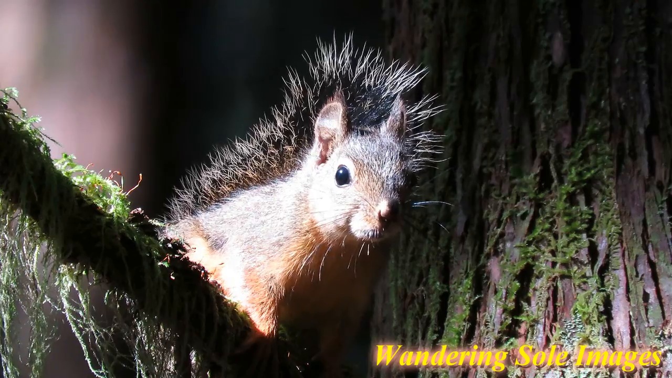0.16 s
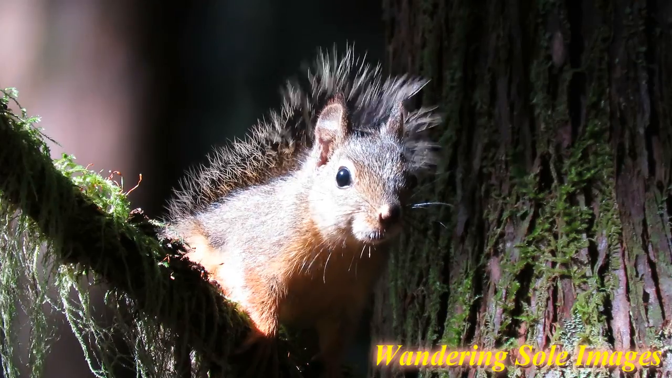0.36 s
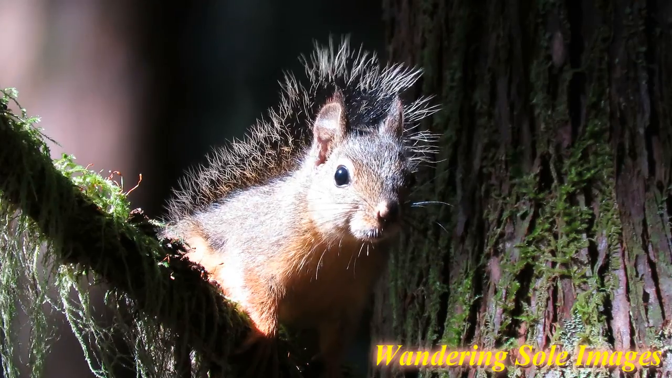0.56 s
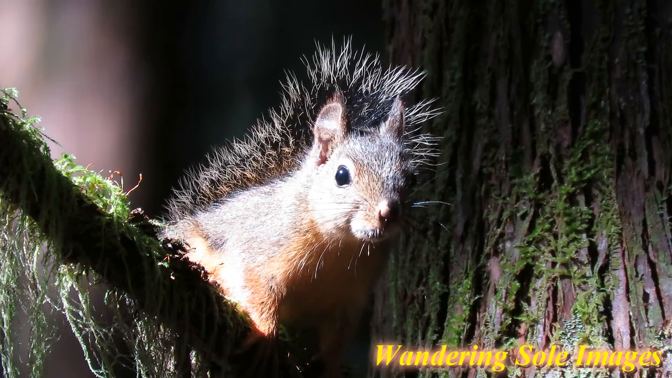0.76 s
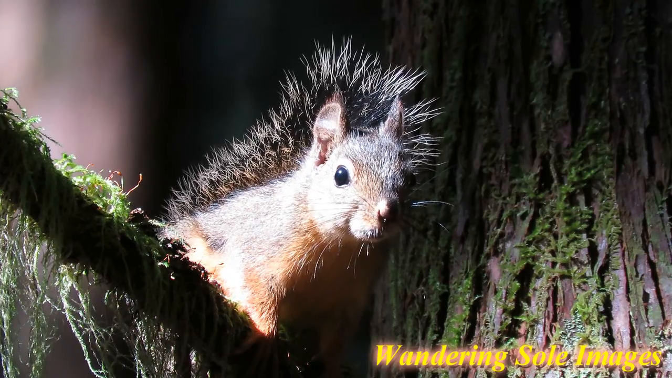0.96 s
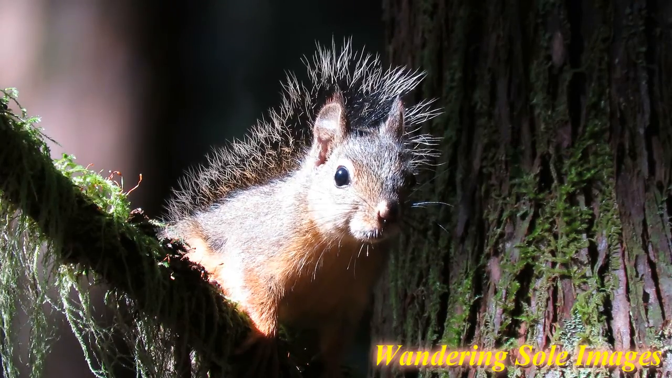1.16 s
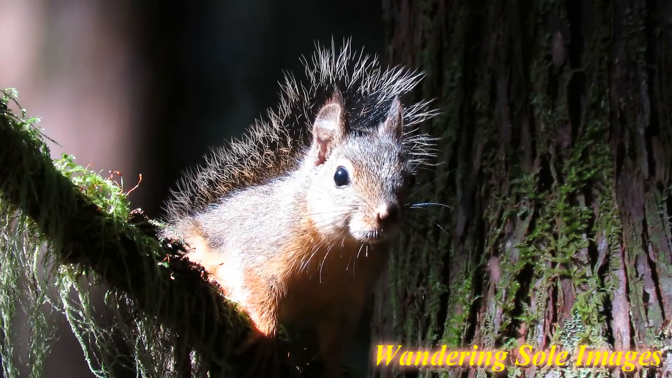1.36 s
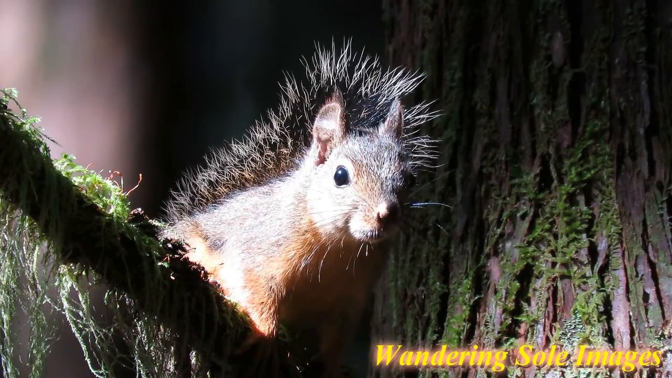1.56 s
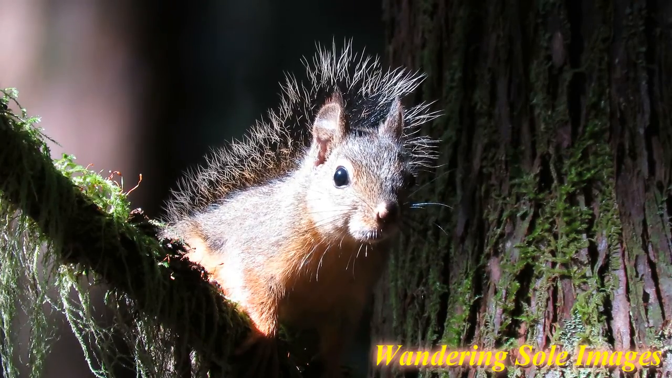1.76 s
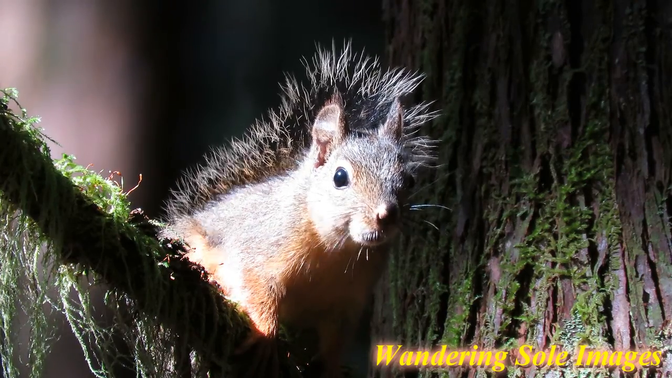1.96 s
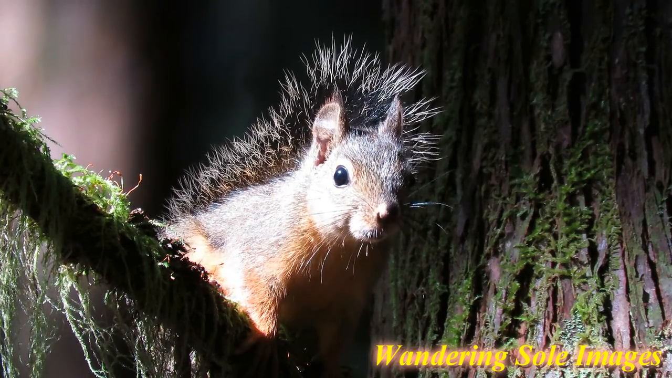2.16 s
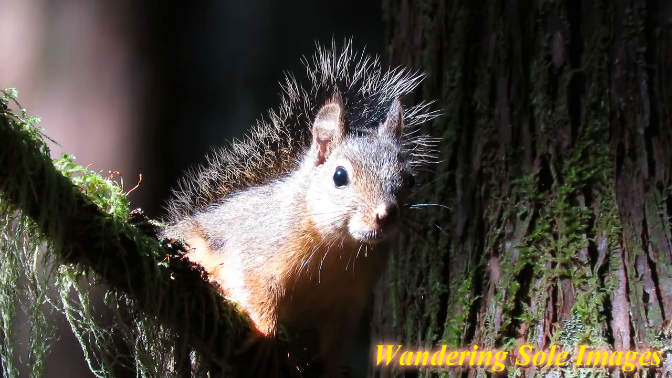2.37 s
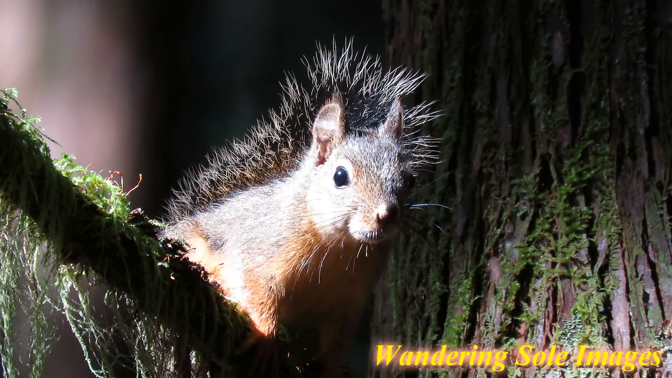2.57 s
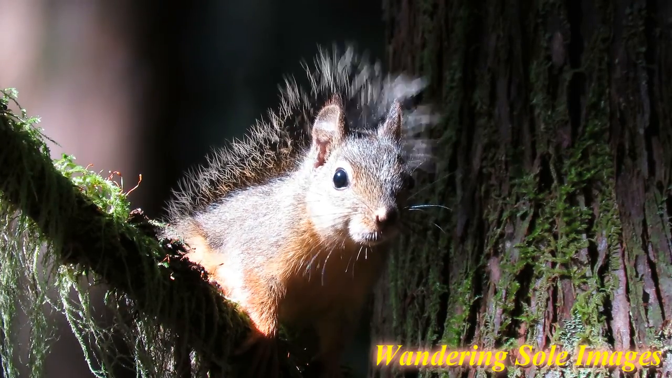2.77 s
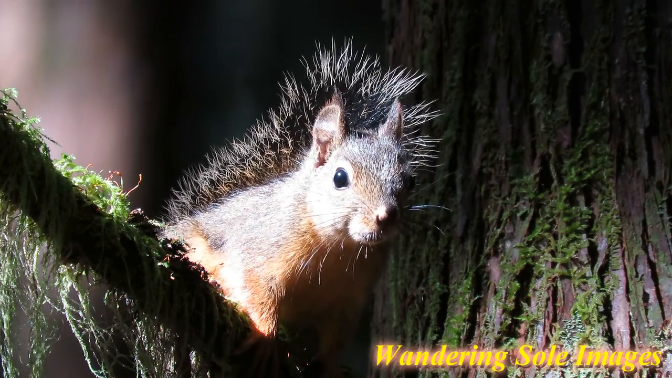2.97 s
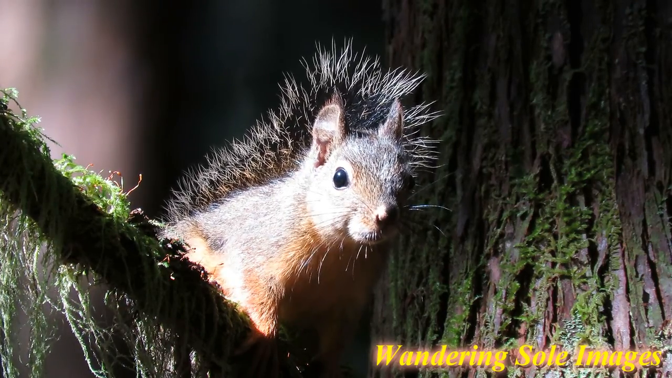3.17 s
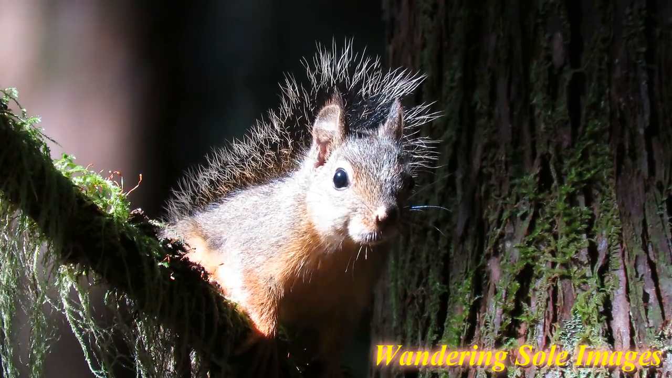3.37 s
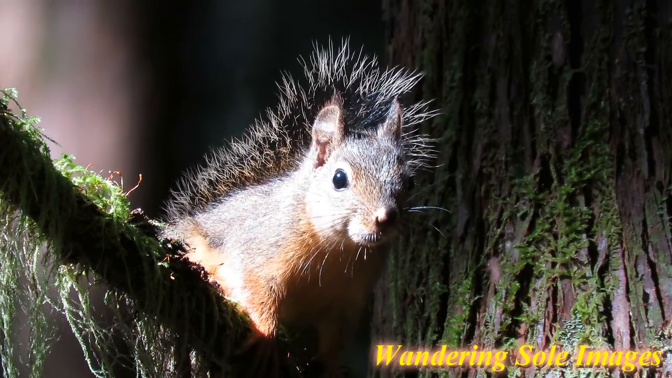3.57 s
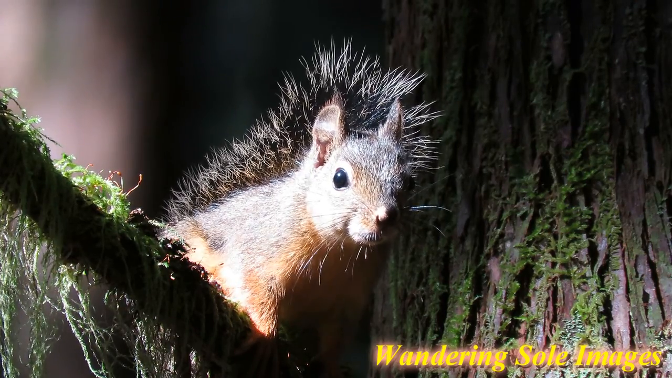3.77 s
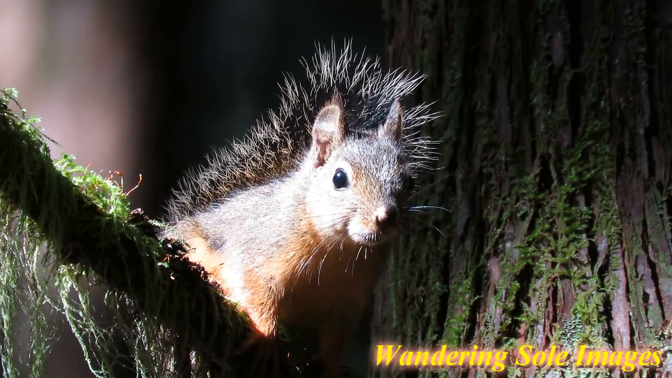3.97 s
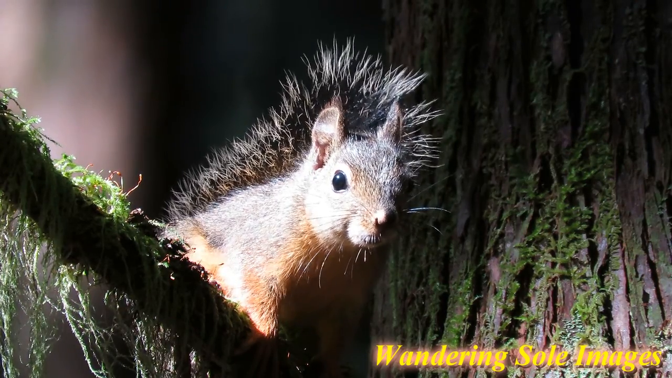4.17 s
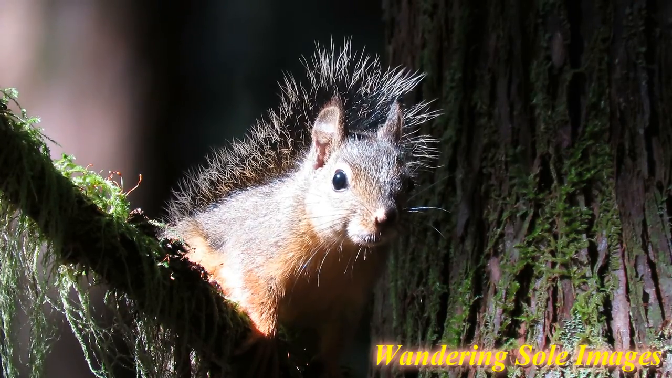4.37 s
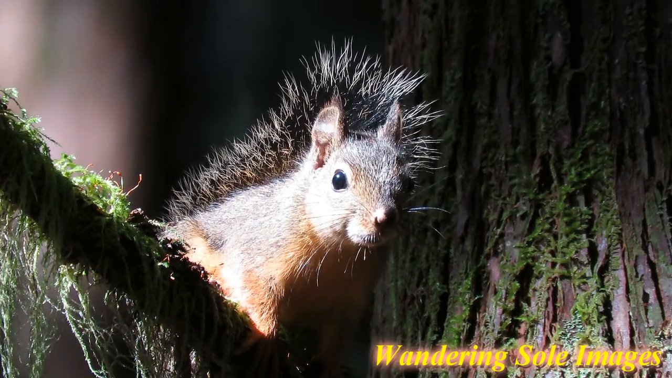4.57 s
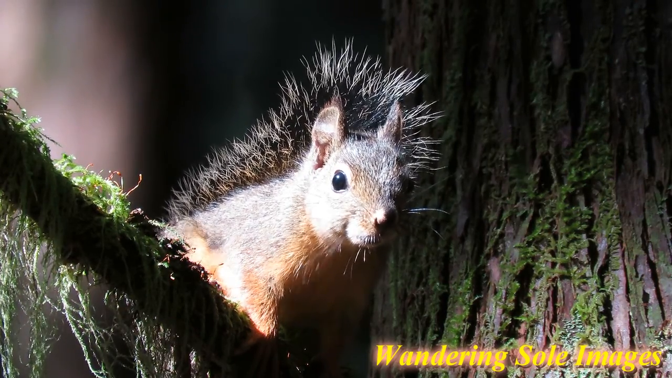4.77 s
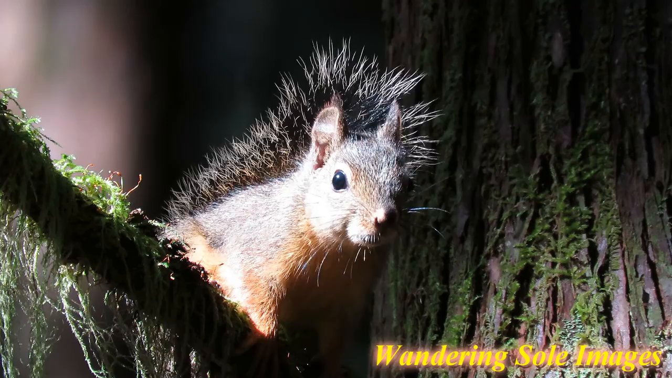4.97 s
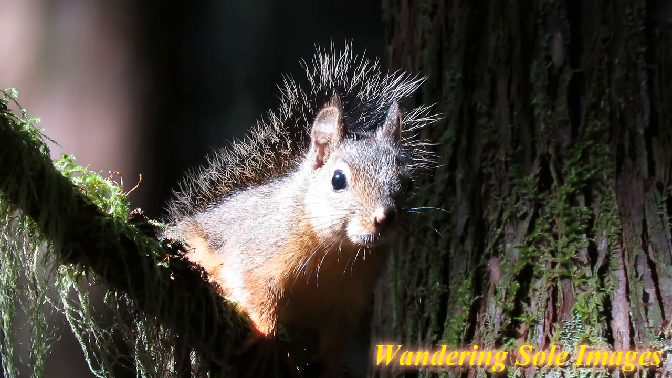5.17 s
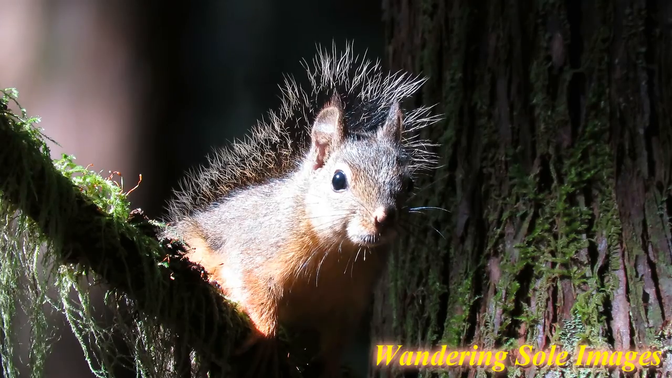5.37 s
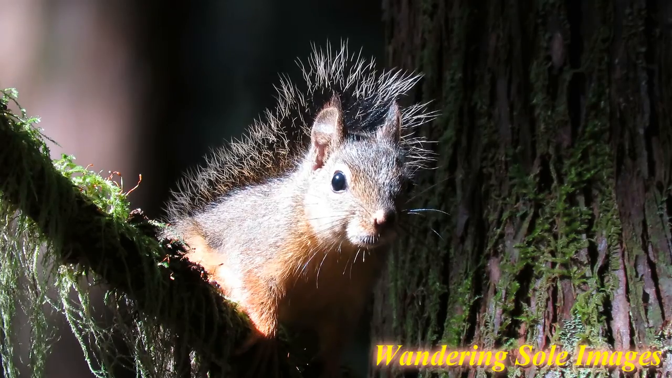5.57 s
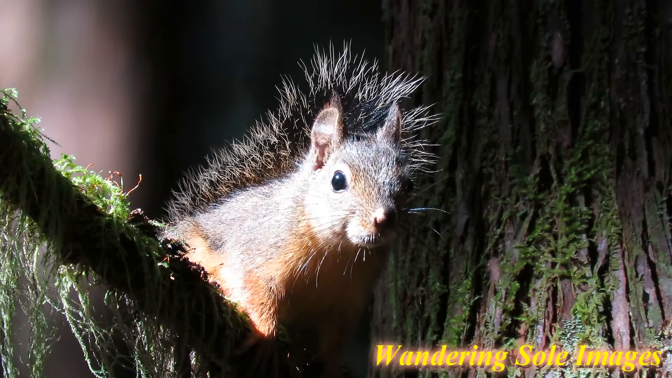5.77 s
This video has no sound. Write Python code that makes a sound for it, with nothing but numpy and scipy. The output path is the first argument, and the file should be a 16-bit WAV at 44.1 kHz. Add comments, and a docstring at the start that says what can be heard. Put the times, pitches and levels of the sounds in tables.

```python
"""In a wood, a stereo microphone faces a squirrel on a branch a few metres off, giving eight alarm chirps.
Each is a near-sine whistle that breaks and slides down with a flutter; a rising squeak follows the last.
Noise echoes scatter the calls off the trunks. Three low lines make a far engine's drone, and a stack of
wing-beat multiples makes a fly that buzzes past once. Filtered noise rustles widely around the microphone."""
import sys
import numpy as np
from scipy import signal
from scipy.fft import rfft, irfft, next_fast_len
from scipy.io import wavfile

SR = 44100
rng = np.random.default_rng(int(sys.argv[2]) if len(sys.argv) > 2 else 0)


def unload_wav(signal):
    """Save mono or channel-first audio to the path in sys.argv[1] as 16-bit WAV at rate SR, clipped to [-1, 1]."""
    wavfile.write(
        sys.argv[1],
        SR,
        np.round(np.clip(np.atleast_2d(signal).T, -1, 1) * 32767).astype(np.int16),
    )


N = 256970
T = np.arange(N) / SR  # s
M = next_fast_len(N)
BINS_HZ = np.fft.rfftfreq(M, 1 / SR)

# far engine, strength of its three lines: (time [s], multiple 1 [dB], multiple 2 [dB], multiple 3 [dB])
ENGINE_LINES = [(0.0, -60, -55, -73), (0.34, -54, -53.5, -64.5), (0.66, -65.5, -74, -60),
                (0.83, -59, -51.5, -62), (0.96, -64, -63, -52.5), (1.25, -62, -50, -65.5),
                (1.34, -54.5, -60, -73), (1.62, -57.5, -48, -66), (1.98, -64.5, -58.5, -60),
                (2.29, -51, -58.5, -64), (2.42, -50.5, -55.5, -74), (2.51, -51.5, -48.5, -61),
                (2.65, -54, -78, -67), (2.71, -56, -58, -65), (2.9, -59, -67, -56), (3.07, -68, -58, -63),
                (3.31, -52.5, -51, -57), (3.46, -65, -49.5, -60), (3.6, -63, -57.5, -67),
                (4.67, -58, -57, -68), (5.37, -61, -54.5, -63), (5.5, -71, -59.5, -73),
                (5.83, -58, -69.5, -59.5)]
# far engine, pitch of its lowest line: (time [s], frequency [Hz])
ENGINE_PITCH = [(0, 95), (3.3, 95), (4.2, 96.2), (4.9, 96.2), (5.5, 95)]
# colour of the noise straight ahead, with a steep fall in the top treble, before its overall level is set:
# (frequency [Hz], density [dB per Hz])
NOISE_MID_COLOUR = [(12, -71), (20, -37), (64, -20), (90, -12.5), (190, -10.5), (300, -12), (476, -13),
                    (640, -17.5), (850, -17), (1010, -13.5), (1200, -20.5), (4000, -30), (10000, -43),
                    (12600, -49.5), (14500, -54), (15400, -72)]
# colour of the noise out to the sides, likewise: (frequency [Hz], density [dB per Hz])
NOISE_SIDE_COLOUR = [(12, -70), (20, -42), (45, -34), (112, -13), (152, -8.5), (258, -3.5), (450, -3),
                     (546, -9.5), (664, -9), (6670, -33), (10000, -40.5), (12600, -43), (14500, -58),
                     (15400, -70)]
# chirps, levels ahead of the throat: (onset [s], whistle length [s], top pitch [Hz], whistle level [dB],
#  effort setting of the break [1], dip pitch [Hz], shelf end after the break [s], shelf end pitch [Hz],
#  low note peak after the break [s], low note level [dB], pitch flutter [share], level flutter [share])
CHIRPS = [(0.465, 0.027, 2804, -24.5, 0.84, 1528, 0.097, 1479, 0.14, -22, 0.056, 0.59),
          (1.371, .028, 2804, -25, 1.42, 1518, .094, 1499, 0.13, -24, 0.078, 0.37),
          (2.138, .028, 2822, -25, 1.46, 1761, 0.1, 1378, .134, -24.5, 0.092, 0.29),
          (2.862, .026, 2789, -24.5, 1.25, 1500, 0.085, 1400, 0.13, -22.5, .078, 0.38),
          (3.564, .029, 2814, -23.5, 1.5, 2057, .11, 1400, 0.15, -24, 0.079, 0.57),
          (4.246, .026, 2748, -24.5, 1.4, 1689, .1, 1450, .136, -23, .07, 0.25),
          (4.964, 0.027, 2781, -24, 1.94, 2072, 0.086, 1470, .110, -27.5, 0.031, 0.36),
          (5.555, 0.027, 2810, -25, 1.85, 1578, .11, 1493, 0.14, -26.5, 0.039, .24)]
# opening of each whistle: (time from onset [s], pitch [share of top], level re whistle [dB], effort [1])
WHISTLE_OPENING = [(-.010, .58, -24, 0), (-.006, .60, -10, 0.85), (-.004, .84, -8, 0.89),
                   (.003, .92, -5.5, 1.14), (.012, .95, -1, 0.77)]
# mouth and throat resonances: (frequency [Hz], gain [dB])
THROAT_GAIN = [(900, -15), (1500, -9), (2100, -10.5), (2450, -3.5), (2780, 0.5), (3300, -16.5),
               (3800, -0.5), (4300, 9.5), (5150, 12), (5650, -2.5), (6300, 12.5), (7300, 1), (8300, -7),
               (9400, 1.5), (10700, 8), (11400, -4.5), (12300, 4.5), (14000, -13)]
# vocal folds at full effort, multiples 1-4: (level [dB])
FOLD_OVERTONES = [-0.5, -16.5, -34.5, -28]
# air rushing past the teeth: (frequency [Hz], gain against the voice [dB])
BREATH_COLOUR = [(1000, -24), (2600, -10), (3400, -21.5), (4600, -4), (6300, -19.5), (7300, -18),
                 (8400, -21), (9400, -16), (11000, -13.5), (12400, -19), (13500, -41), (15000, -51)]
# rising squeak, ahead of the throat: (time [s], pitch [Hz], level [dB])
SQUEAK_GLIDE = [(5.728, 1010, -46), (5.74, 1034, -41), (5.76, 1307, -39.5), (5.78, 1640, -40.5),
                (5.799, 1866, -33.5), (5.827, 2010, -33)]
# folds driven by indrawn air, multiples 1-9: (level [dB])
SQUEAK_OVERTONES = [0.5, -34, -41, -48, -50, -46, -39, -48, -40]
# echoes off branch, near trunks, far trunks: (start [s], 60 dB decay [s], level [dB], side re mid [dB])
TRUNK_ECHOES = [(.002, .07, -10.5, -7), (0.027, .22, -14.5, -9.5), (0.083, .8, -24, -11)]
# thin trunks scatter treble best: (frequency [Hz], gain [dB])
BARK_COLOUR = [(800, -6.5), (1600, -1), (2800, 1.5), (5000, -1), (11000, 2), (15000, 21)]
# wing beat, multiples 1-8: (level [dB])
WING_OVERTONES = [0.5, 0.5, -5.5, -1.5, -5, -8, -9, -13]

WOOD_MID_DB, WOOD_SIDE_DB = -52, -47  # rms above 300 Hz, before gusts
RASP_DB, WOBBLE = 4.5, 0.01134  # drift of overtone level; drift of pitch as a share
DIP_S, REBOUND_S, SETTLE_S = .012, .022, .043  # after the break
REBOUND_HZ, REBOUND_DB = 1948, -26  # level for a dip that only reaches the rebound pitch
REBOUND_DB_PER_KHZ = 5  # a deeper dip rebounds louder
SHELF_HZ, SHELF_HZ_PER_EFFORT = 1303, 202.6  # a harder break starts the shelf higher
SHELF_DB, SHELF_SAG_DB = -24, -2
STEP_S, STEP_DB, STEP_DB_PER_FLUTTER = 0.01555, -28, -8  # weak spot, deeper where the level flutters
LOW_HZ, LOW_HOLD_S = 1186, .014  # low note, near full level this long before its peak
FADE_HZ, FADE_S, FADE_DB = 1031, .029, -13  # fade of the low note
FLUTTER_HZ = 115  # mean rate
FLUTTER_LEAD = 0.82  # radians by which the level swing leads the pitch swing
SLIDE_DULL_DB, SLIDE_BREATH_DB, BREATH_FADE_S = -11.5, -22.5, 0.038
FLY_S, FLY_DB = 1.948, -56  # arrival; level of approach before the wing-beat levels
FLY_ATTACK_S, FLY_HOLD_S, FLY_FADE_DB_PER_S = 0.067, .17, -48
WING_HZ = 163.6
WING_SAG_HZ, WING_SAG_S, WING_SAG_WIDTH_S = 8, 2.19, .17  # the beat slows while the fly is near
TOP_HZ = 15300  # top of the audible band


def undb(db):
    """Turn decibels into an amplitude factor."""
    return np.exp(np.asarray(db) * (np.log(10) / 20))


def along(table, hz):
    """Read a (frequency [Hz], level [dB]) table on a log-frequency axis."""
    f, db = np.transpose(table)
    return np.interp(np.log(np.maximum(hz, 1)), np.log(f), db)


def walk(rate):
    """Random drift joined by straight lines, a new value every 1 / rate s; spread near 1."""
    knots = rng.standard_normal(int(N / SR * rate) + 2)
    return 1.167 * np.interp(T * rate, np.arange(len(knots)), knots)


def stack(hz, gains):
    """Sines on the multiples of a moving pitch, each of rms gain."""
    phase = 2 * np.pi * np.cumsum(hz) / SR
    out = 0
    for k, gain in enumerate(gains):
        out = out + np.sqrt(2) * gain * np.sin((k + 1) * phase + 2 * np.pi * rng.random())
    return out


def drone():
    """Far engine: three low lines that fade in and out as the air between shifts."""
    s, *lines_db = np.transpose(ENGINE_LINES)
    gains = [undb(np.interp(T, s, db) + 1.7 * walk(10)) for db in lines_db]
    return stack(np.interp(T, *np.transpose(ENGINE_PITCH)), gains)


def wood(colour, db, gust):
    """Rustle and far traffic: noise in octave bands that swell together and flicker alone."""
    noise = rfft(rng.standard_normal(M)) * undb(along(colour, BINS_HZ))
    octave = np.log2(np.clip(BINS_HZ, 80, 10240) / 80)
    out = 0
    for band in range(8):
        share = np.clip(1 - abs(octave - band), 0, 1)  # neighbouring bands crossfade
        out = out + irfft(noise * share, M)[:N] * undb(gust + 0.77 * walk(5))
    return out * undb(db) / np.std(irfft(noise * (BINS_HZ > 300), M))


def voice(hz, db, overtones_db):
    """Multiples of a moving pitch, throat-coloured; uneven closing of the folds breaks up the overtones."""
    on, out = db > -80, np.zeros(N)
    phase = 2 * np.pi * np.cumsum((hz * (1 + WOBBLE * walk(500)))[on]) / SR
    for k, overtone_db in enumerate(overtones_db):
        drift_db = (RASP_DB if k else 1.6) * walk(300)
        gain_db = (db + overtone_db + drift_db)[on] + along(THROAT_GAIN, (k + 1) * hz[on])
        out[on] -= np.sqrt(2) * undb(gain_db) * np.cos((k + 1) * phase)
    return out


def gestures():
    """Pitch, level, effort, and the flutter of pitch and of level as loose tissue flaps in the chirps."""
    rows, shake_hz, shake_level = [], np.zeros(N), np.zeros(N)
    for (s, head, top, db, snap, dip, shelf, shelf_end,
         low_s, low_db, pitch_share, level_share) in CHIRPS:
        # rows are (time [s], pitch [Hz], level [dB], effort)
        rows += [(s - .013, WHISTLE_OPENING[0][1] * top, -90, 0)]
        rows += [(s + t, share * top, db + d, e) for t, share, d, e in WHISTLE_OPENING]
        # the whistle breaks, dips, rebounds and settles on a fluttering shelf
        b = s + head
        back_db = REBOUND_DB + REBOUND_DB_PER_KHZ * (REBOUND_HZ - dip) / 1000
        rows += [(b - .007, top, db + 0.48, .9),
                 (b, .955 * top, db - .6, 0.62 + snap / 2),
                 (b + .004, .78 * top, back_db - 7, 0.7 + snap / 2),
                 (b + DIP_S, dip, back_db, .85),
                 (b + REBOUND_S, REBOUND_HZ, back_db, .05),
                 (b + SETTLE_S, SHELF_HZ + SHELF_HZ_PER_EFFORT * snap, SHELF_DB, 0),
                 (b + shelf - STEP_S / 2, shelf_end, SHELF_DB + SHELF_SAG_DB, 0)]
        # it steps down through a weak spot to a low note that drops away
        low = b + low_s
        step_db = STEP_DB + STEP_DB_PER_FLUTTER * level_share
        rows += [(b + shelf + STEP_S / 2, 1.07 * LOW_HZ, step_db, .3),
                 (low - LOW_HOLD_S, 1.01 * LOW_HZ, low_db - 3.0, .45),
                 (low + 0.00298, .96 * LOW_HZ, low_db, .45),
                 (low + .011, .94 * LOW_HZ, low_db + FADE_DB / 2, .6),
                 (low + FADE_S, FADE_HZ, low_db + FADE_DB, .95),
                 (low + FADE_S + .006, .93 * FADE_HZ, -90, 0)]
        # first the pitch shakes, later the level too
        flap = 2 * np.pi * (FLUTTER_HZ * T + rng.random() + 0.3004 * walk(60))
        pitch_span = np.interp(T - b, [.025, .045, shelf, shelf + 0.022], [0, 1, 1, 0])
        level_span = np.interp(T - b, [.025, .07, shelf, low_s], [0, 1, 1, 0])
        shake_hz += pitch_share * undb(2.65 * walk(70)) * pitch_span * np.sin(flap)
        shake_level += level_share * undb(2.7 * walk(70)) * level_span * np.sin(flap + FLUTTER_LEAD)
    s, *columns = np.array(sorted(rows)).T
    return [np.interp(T, s, c) for c in columns] + [shake_hz, shake_level]


def squirrel():
    """Near-sine chirps whose overtones grow with effort, their breath, then the thin rising squeak."""
    hz, db, effort, shake_hz, shake_level = gestures()
    # the rush of air is full during the whistle and ebbs after the break
    breaks = np.array([s + head for s, head, *_ in CHIRPS])[:, None]
    ebb_times = (breaks + [-.06, 0, BREATH_FADE_S, .3]).ravel()
    ebb = np.interp(T, ebb_times, np.tile([0, 0, 1, 1], len(breaks)))
    # effort feeds the octave; the multiples above it need the rush of air
    overtones_db = []
    for k, fold_db in enumerate(FOLD_OVERTONES):
        dulling = 1 - effort if k == 1 else k * ebb
        overtones_db.append(fold_db + SLIDE_DULL_DB * dulling)
    tone = voice(hz * (1 + shake_hz), db, overtones_db)
    breath = irfft(rfft(rng.standard_normal(M)) * undb(along(BREATH_COLOUR, BINS_HZ)), M)[:N]
    breath = breath * undb(db + SLIDE_BREATH_DB * ebb + 1.3 * walk(250))
    s, squeak_hz, squeak_db = np.transpose(SQUEAK_GLIDE)
    squeak_level = np.interp(T, s, squeak_db, left=-120)
    squeak = voice(np.interp(T, s, squeak_hz), squeak_level, SQUEAK_OVERTONES)
    return np.clip(1 + shake_level, .05, 2) * tone + breath + squeak


def trunks(call):
    """Uneven, decaying noise echoes off the branch, near trunks and far trunks; mid and side."""
    t, echoes = T[:SR], 0
    for start, t60, db, side_db in TRUNK_ECHOES:
        decay = undb(3.1 * walk(119.5)[:SR] - 60 * t / t60)
        group = rng.standard_normal((2, SR)) * decay * (t > start)
        mid_energy = np.sum(group[0] ** 2)
        echoes = echoes + group / np.sqrt(mid_energy) * undb([[db], [db + side_db]])
    scattered = irfft(rfft(call, M) * undb(along(BARK_COLOUR, BINS_HZ)), M)[None, :N]
    return signal.fftconvolve(scattered, echoes)[:, :N]


def fly():
    """Slightly unsteady wing beats with many strong multiples; the fly comes near quickly and drifts off."""
    t = T - FLY_S
    fade_db = FLY_FADE_DB_PER_S * np.maximum(t - FLY_ATTACK_S - FLY_HOLD_S, 0)
    near = np.clip(t / FLY_ATTACK_S, 0, 1) ** 2 * undb(FLY_DB + fade_db)
    hz = WING_HZ - WING_SAG_HZ * np.exp(-((T - WING_SAG_S) / WING_SAG_WIDTH_S) ** 2)
    unsteady_hz = hz * (1 + 0.00612 * walk(40.2))
    return near * stack(unsteady_hz, [undb(db + 3.4 * walk(15)) for db in WING_OVERTONES])


def scene():
    """Place the call almost centrally, engine and fly dead centre, and echoes and wood in mid and side."""
    call = squirrel()
    gust = 0.68 * walk(0.42)  # dB, shared by mid and side
    echo_mid, echo_side = trunks(call)
    mid = call + echo_mid + drone() + fly() + wood(NOISE_MID_COLOUR, WOOD_MID_DB, gust)
    side = 0.017 * call + echo_side + wood(NOISE_SIDE_COLOUR, WOOD_SIDE_DB, gust)
    return np.array([mid + side, mid - side])


def record(dry):
    """A steep elliptic low-pass leaves no treble above TOP_HZ."""
    return signal.sosfilt(signal.ellip(10, .2, 70, TOP_HZ, fs=SR, output="sos"), dry)


dry = scene()
out = record(dry)
unload_wav(out)
```